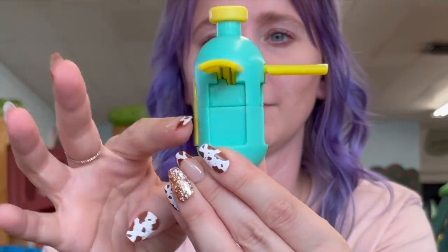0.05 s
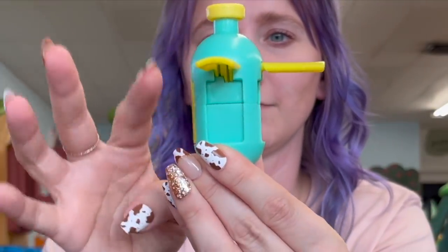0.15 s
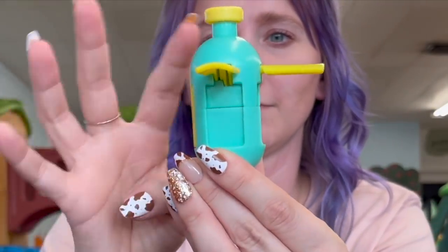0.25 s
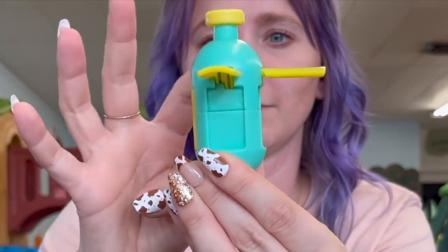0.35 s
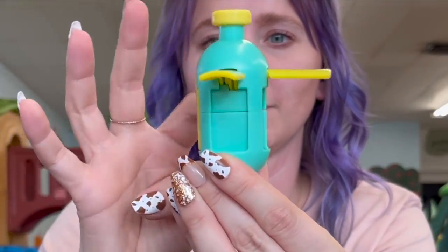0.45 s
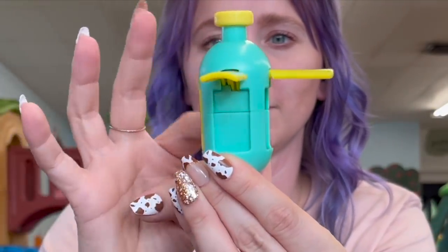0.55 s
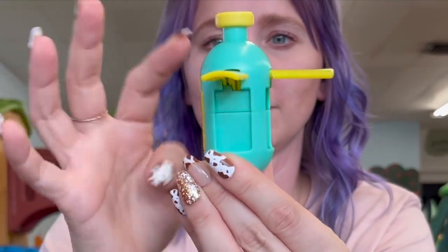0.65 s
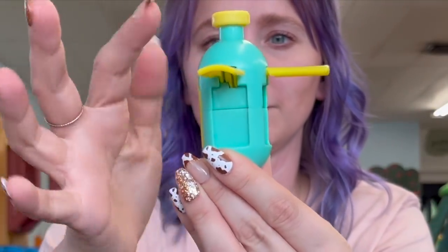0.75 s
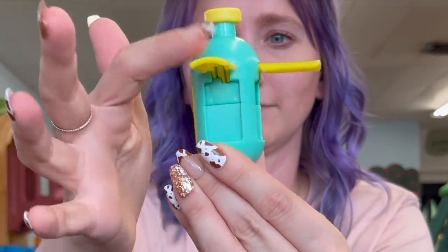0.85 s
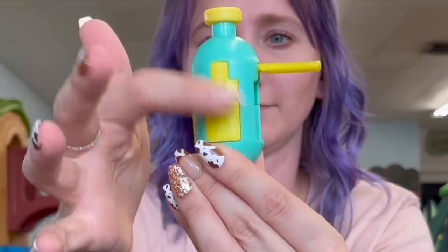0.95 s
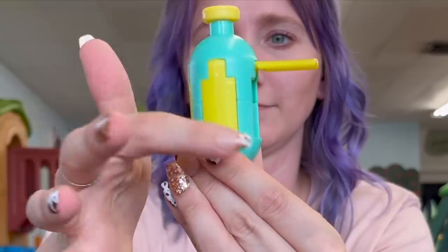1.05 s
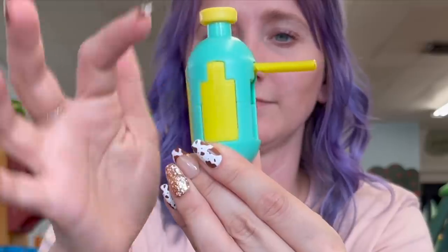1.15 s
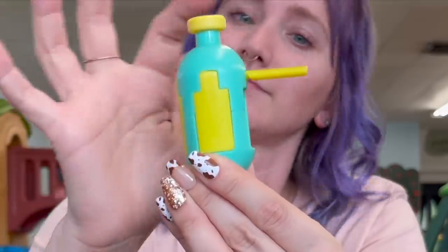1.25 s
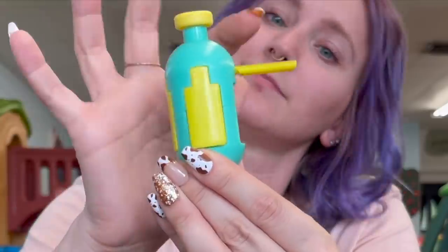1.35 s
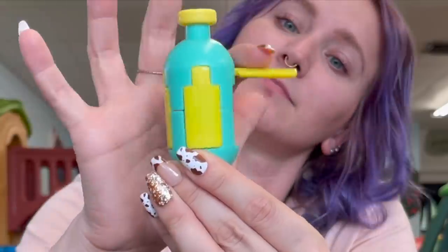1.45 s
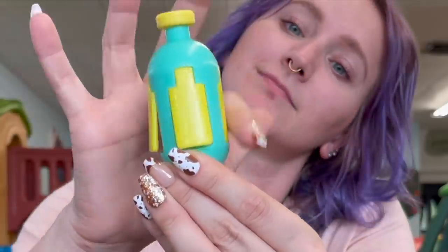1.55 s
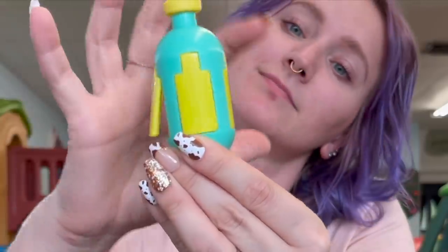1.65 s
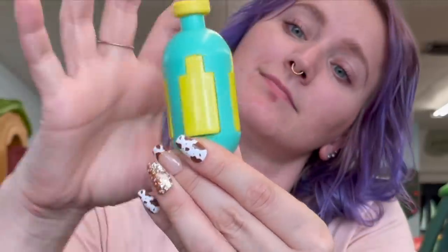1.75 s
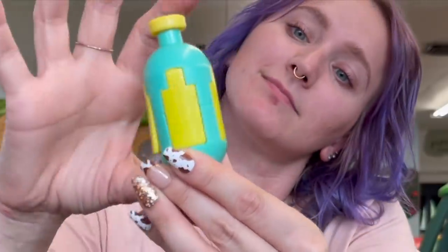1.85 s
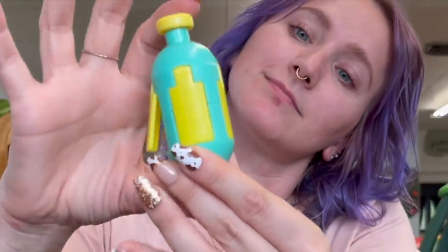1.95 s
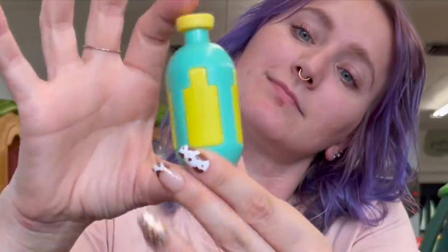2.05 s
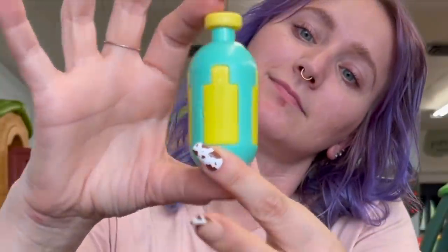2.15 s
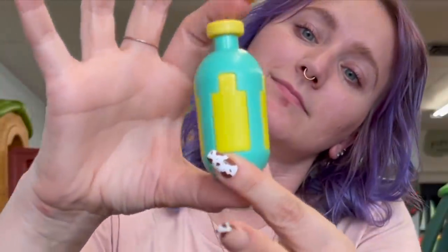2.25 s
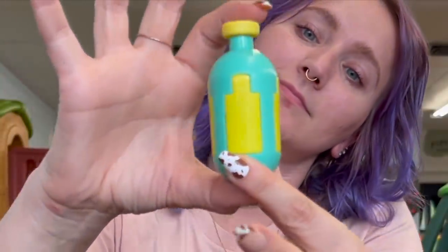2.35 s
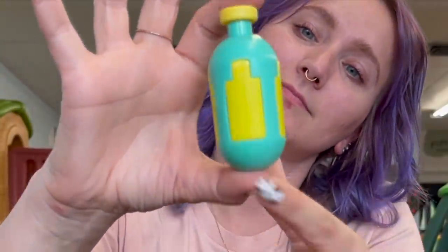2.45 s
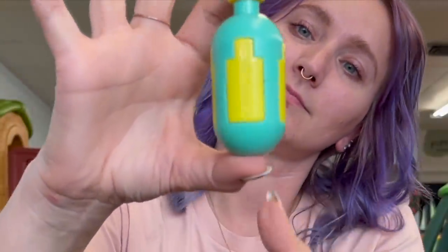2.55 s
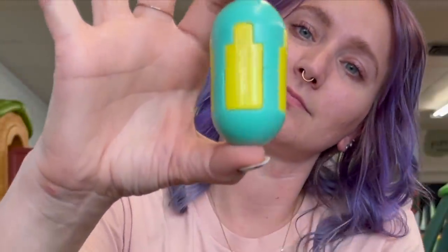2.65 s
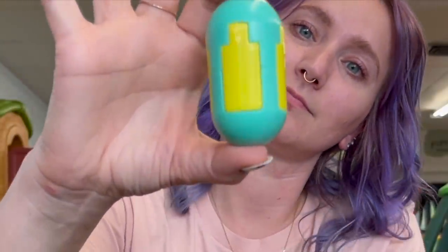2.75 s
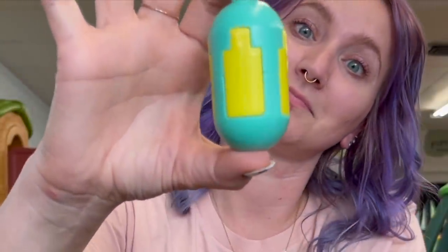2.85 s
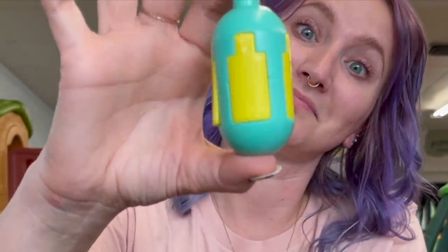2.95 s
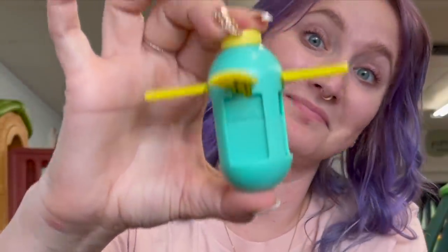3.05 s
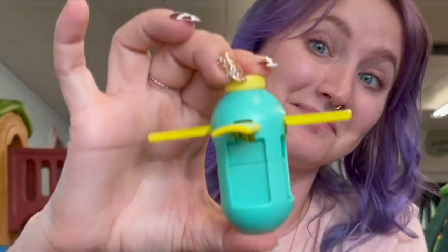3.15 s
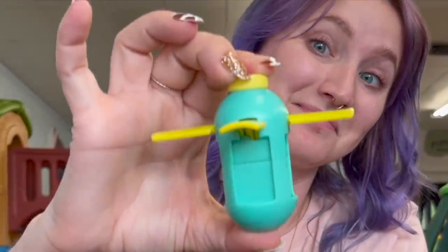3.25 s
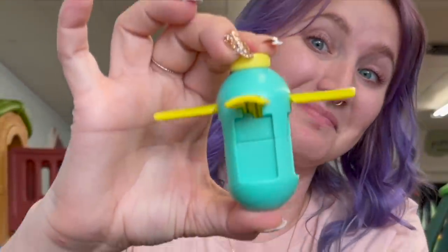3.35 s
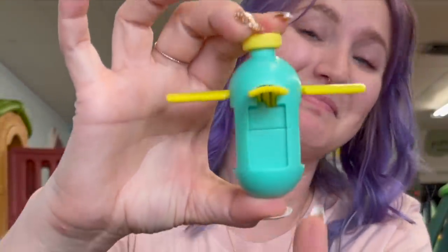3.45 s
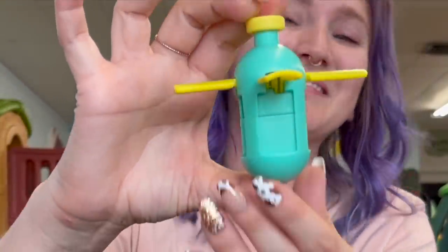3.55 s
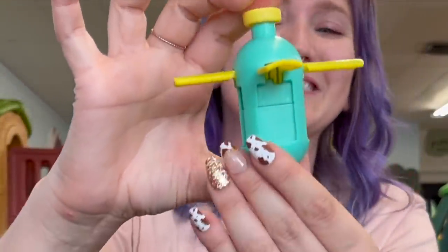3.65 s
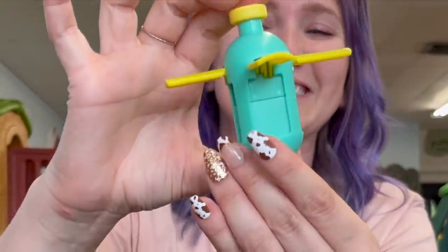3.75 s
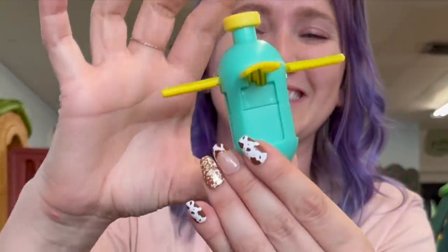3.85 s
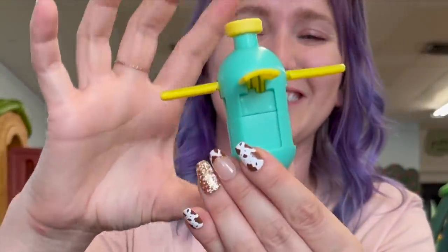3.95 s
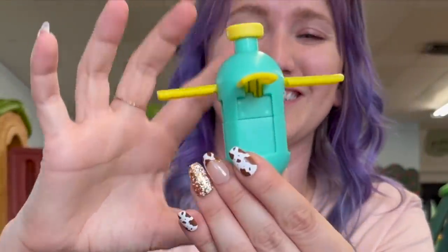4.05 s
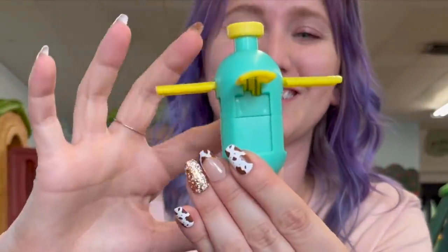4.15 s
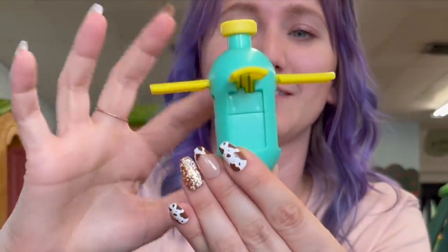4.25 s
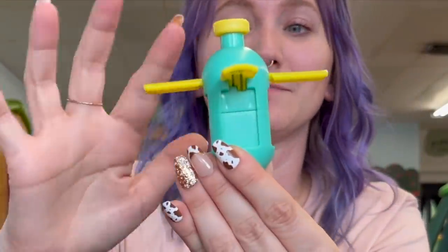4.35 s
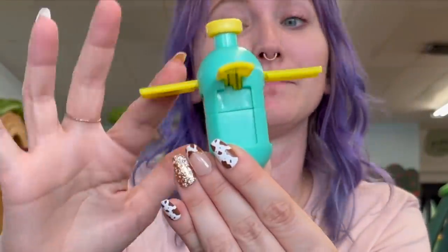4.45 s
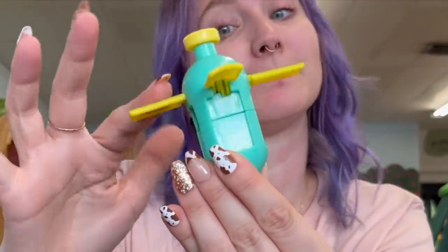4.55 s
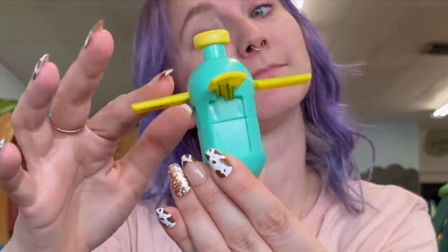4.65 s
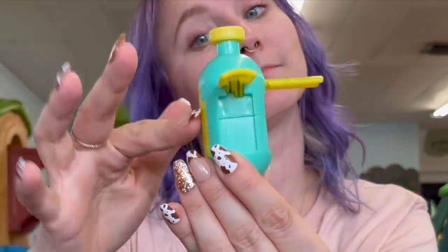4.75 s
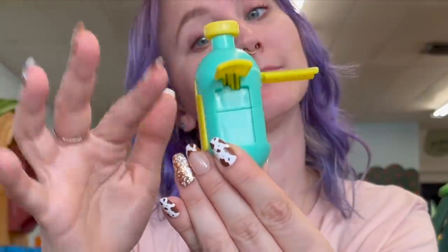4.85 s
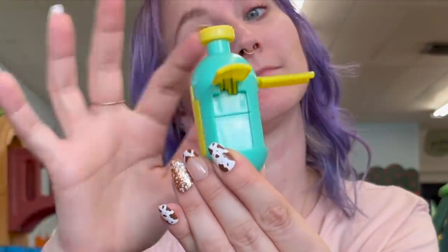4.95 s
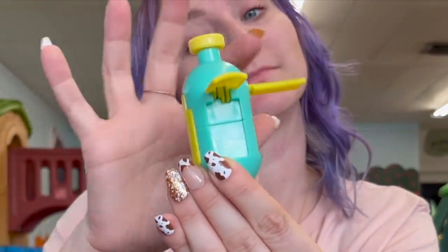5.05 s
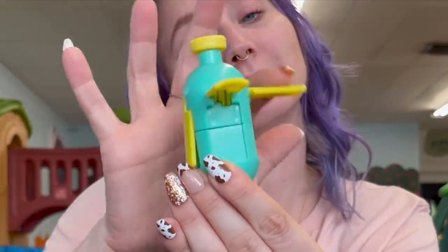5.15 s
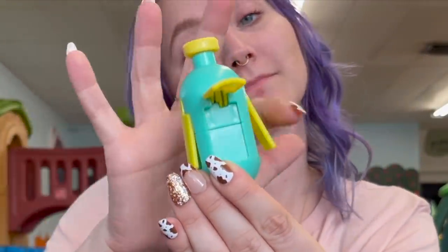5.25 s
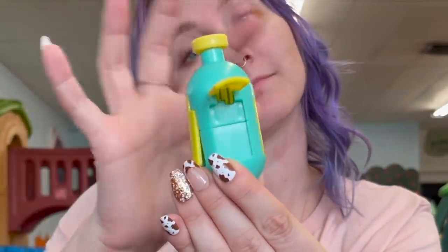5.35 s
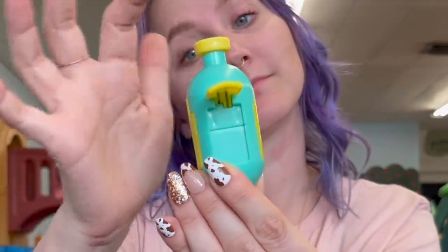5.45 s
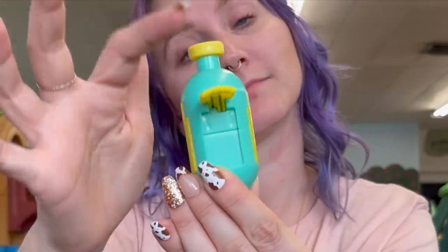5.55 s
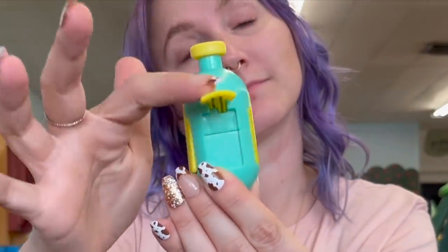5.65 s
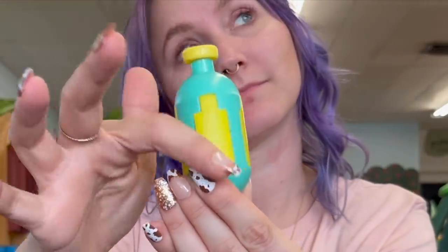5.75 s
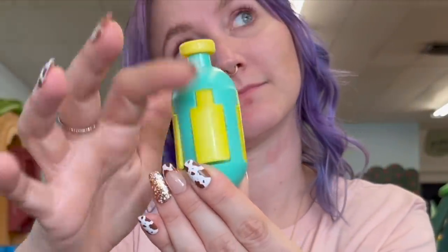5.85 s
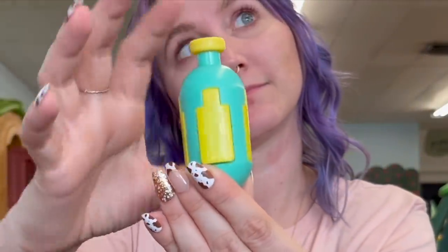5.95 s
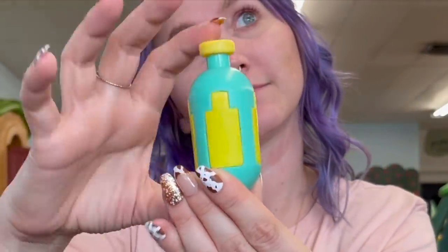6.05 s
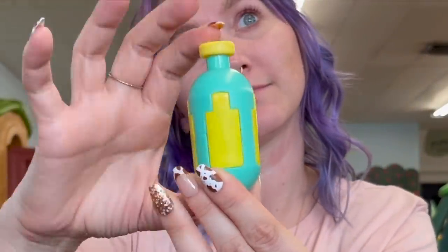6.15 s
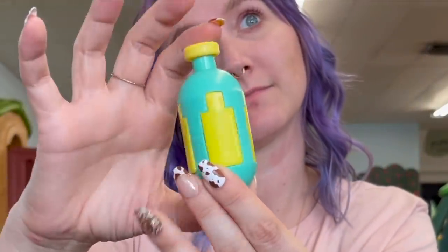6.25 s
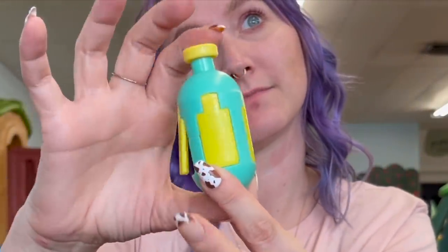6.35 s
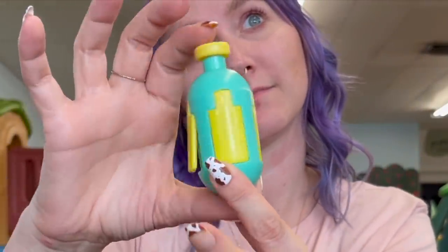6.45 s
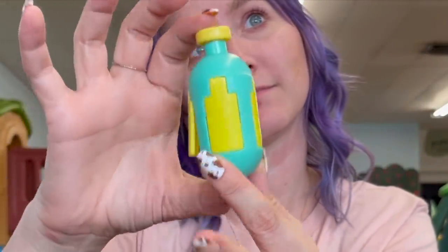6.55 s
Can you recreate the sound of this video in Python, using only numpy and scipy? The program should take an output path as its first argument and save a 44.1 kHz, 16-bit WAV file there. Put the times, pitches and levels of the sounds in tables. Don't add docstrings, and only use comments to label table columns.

```python
import sys
import numpy as np
from scipy import signal
from scipy.fft import rfft, irfft, next_fast_len
from scipy.io import wavfile
from scipy.ndimage import uniform_filter1d

SR = 44100
rng = np.random.default_rng(int(sys.argv[2]) if len(sys.argv) > 2 else 0)


def file_out(sig):
    cols = np.atleast_2d(sig).T
    lim = np.clip(cols, -1, 1)
    pcm = np.round(lim * 32767).astype(np.int16)
    wavfile.write(sys.argv[1], SR, pcm)


def boost(x):
    u = np.asarray(x, float) / 20
    return 10 ** u


N = 291501


def rms_one(x):
    return x / np.sqrt(np.mean(x ** 2) + 1e-20)


def peak_one(x):
    return x / np.abs(x).max()


def at_hz(points, hz):
    table_hz, values = np.array(points)[:, 0], np.array(points)[:, 1]
    return np.interp(np.log(hz), np.log(table_hz + 1), values)


def at_time(points, s):
    times = np.array(points)[:, 0]
    return [np.interp(s, times, column) for column in np.transpose(points)[1:]]


def bandpass(low_hz, high_hz, order=2):
    return signal.butter(order, [low_hz, high_hz], "band", fs=SR, output="sos")


def through(x, response):
    size = next_fast_len(N + 4096)
    hz = np.fft.rfftfreq(size, 1 / SR) + 1
    return irfft(rfft(x, size) * response(hz), size)[..., :N]


def ring(push, hz, t60):
    r, w = boost(-60 / (t60 * SR)), 2 * np.pi * hz / SR
    return signal.lfilter([0, np.sin(w)], [1, -2 * r * np.cos(w), r * r], push)


# f/Hz, left-right likeness [0 to 1]
LIKENESS = [(30, .99), (100, .95), (160, .75), (300, .4), (700, .1), (2000, .4), (4400, .55), (9000, .9),
            (12000, .93)]


def bands(size, shape):
    out, edges = 0, 25 * 2 ** (np.arange(29) / 3)
    white = rng.standard_normal((2, 2, size))
    for k, (low, high) in enumerate(zip(edges, edges[1:])):
        mid, side = signal.sosfilt(bandpass(low, high), white[k % 2])
        hz = np.sqrt(low * high)
        alike = np.clip(at_hz(LIKENESS, hz), 0, 1)
        stereo = np.sqrt(1 + alike) * mid + np.sqrt(1 - alike) * side * [[1], [-1]]
        out = out + shape(hz) * stereo
    return out


# f/Hz, level [dB per Hz]
AIR_NOISE = [(30, -6.5), (50, 1), (80, 0.5), (134, -10), (175, -21.5), (290, -24), (460, -28.5),
             (800, -33.5), (1900, -50.5), (2600, -60.5), (4000, -62.5), (8800, -62), (10300, -71),
             (12000, -74)]
# f/Hz, width [Hz], level/dB
DUCT_RESONANCES = [(46.5, 14, -58), (58.28, 1.8, -51), (73.6, 230, -57)]
# f/Hz, level/dB
MAINS_HUM = [(120, -55.5), (240, -79)]


def ventilation():
    air = boost(-51) * rms_one(bands(N, lambda hz: boost(at_hz(AIR_NOISE, hz))))
    t = np.arange(N) / SR
    for hz, width_hz, level_db in DUCT_RESONANCES:
        duct = ring(rng.standard_normal(N + SR), hz, 6.0 / width_hz)[SR:]
        air = air + boost(level_db) * rms_one(duct)
    for hz, level_db in MAINS_HUM:
        tone = np.sin(2 * np.pi * hz * t + 6 * rng.random())
        air = air + boost(level_db + 1) * tone * boost([[.5], [-.5]])
    return air


# f/Hz, level/dB, t60 [s]
BODY = [(990, -17.5, 0.0081), (1436, -3.5, 0.043), (1490, -3, 0.025), (1737, -2.5, 0.03),
        (1830, -7.5, 0.045), (2000, -9, 0.03)]
WALL = [(3800, -4, 0.024), (4260, -4.5, 0.029), (4714, 0.5, 0.0054), (5000, -1.5, 0.0068),
        (5350, -9.5, 0.012), (5790, 0.5, 0.024), (6500, -2.5, 0.0031), (6840, -4.5, 0.015)]
EDGE = [(7670, -2, 0.0098), (8400, 4.5, 0.012), (9600, -1.5, 0.0023), (10200, 3.5, 0.0042),
        (10460, 6.5, 0.018), (10400, 4, 0.0027), (10730, 0, 0.0051), (11230, -0.5, 0.0032),
        (11300, -4.5, 0.015), (15200, -6, .003)]
# start t/s, end t/s, start level/dB, end level/dB
RUBS = [(0, 0.008, -44.5, -47.5), (0.43, 0.451, -51.5, -53), (0.86, 0.961, -62.5, -67),
        (1.428, 1.46, -55.5, -59.5), (1.474, 1.535, -51, -49.5), (1.749, 1.867, -64, -81),
        (2.036, 2.134, -63.5, -76), (2.176, 2.32, -58, -72.5), (2.365, 2.426, -73, -66),
        (2.512, 2.598, -78.5, -78.5), (2.936, 3.005, -80.5, -42.5), (3.436, 3.476, -49.5, -61),
        (3.491, 3.549, -68, -80.5), (3.745, 3.855, -84.5, -85.5), (4.082, 4.144, -74.5, -53),
        (4.413, 4.482, -75, -75), (4.616, 4.639, -87, -84), (4.696, 4.726, -50, -58.5),
        (5.13, 5.195, -55, -53.5), (5.62, 5.68, -53, -65.5), (5.706, 5.736, -53, -49),
        (5.966, 6.053, -64, -77), (6.184, 6.394, -72.5, -61.5), (6.49, 6.62, -59, -73.5)]


def shell(push):
    modes = BODY[1:] + WALL + EDGE[:5]
    return sum(boost(db) * ring(push, hz, 0.35 * t60) for hz, db, t60 in modes)


def rub():
    slips_per_s, spread_db, skin_cut_hz = 1800, 4.5, 3000
    sizes = boost(spread_db * np.minimum(rng.exponential(1, N), 3))
    slips = sizes * rng.choice([-1, 1], N) * (rng.random(N) < slips_per_s / SR) + 1e-18
    slips = signal.sosfilt(signal.butter(1, skin_cut_hz, fs=SR, output="sos"), slips)
    drag, t = np.zeros(N), np.arange(N) / SR
    for start, end, start_db, end_db in RUBS:
        level = boost(np.interp(t, [start, end], [start_db, end_db]))
        drag += level * np.clip((t - start) / 0.0085, 0, 1) * (t < end)
    return shell(slips * drag + 1e-18) / np.std(shell(slips))


# t/s, peak level/dB, body level/dB, edge level/dB, flap f/Hz
SNAPS = [(0.0109, -16, -9, 8.5, 5700), (0.0424, -21.5, -23.5, 10, 4600), (0.4556, -21.5, -11, 9, 4200),
         (0.9384, -31.5, -7, 5.5, 5620), (0.9481, -11, -6.5, 3, 6410), (0.972, -19, -23.5, 0.5, 5367),
         (0.9788, -26.5, -23, -4, 5300), (1.4932, -7, -7.5, 4, 5770), (1.5224, -28, -21, -19, 5580),
         (1.6358, -36, -10.5, 4.5, 4250), (1.7128, -30.5, -17.5, 2, 5850),
         (2.2144, -34.5, -2.5, -1.5, 4790), (2.9678, -37, 5, -1.5, 4920), (2.979, -26.5, -8.5, 0, 6160),
         (2.9941, -31.5, 8.5, 4, 5200), (3.002, -11, -10, 8.5, 5320), (4.1287, -13.5, -11.5, 6.5, 4550),
         (4.2517, -31, -2, 9, 3810), (4.7205, -14, -14, 8, 4620), (5.1968, -16, -3.5, 12.5, 6840),
         (5.3035, -36, -6.5, 14, 6750), (5.7515, -30.5, -3.5, -21, 5800)]


def snaps():
    return [(s, db, body, edge, 1.334, hz) for s, db, body, edge, hz in SNAPS]


# t/s, peak level/dB, body level/dB, edge level/dB
REBOUNDS = [(0.0142, -20, -7, -1.5), (0.4585, -15.5, -16.5, 4), (0.9514, -21, -4.5, -1),
            (0.9777, -22.5, -19, -8), (1.424, -44.5, -3, 12.5), (1.4357, -52, -8, 12), (1.443, -54, -11, 6),
            (1.506, -27, -6.5, 2.5), (2.9844, -30, -7.5, -3.5), (2.998, -33, -3.5, 9.5),
            (3.0056, -18.5, -9.5, 8), (3.008, -16.5, -10.5, 1), (3.0167, -28.5, 5, -8),
            (4.7276, -19.5, -4.5, -12), (5.2105, -37.5, -4.5, 6.5), (5.7217, -38.5, 3, -4.5),
            (5.74, -32.5, -14, -2)]


def rebounds():
    return [(s, db, body, edge, 0.72, 6200) for s, db, body, edge in REBOUNDS]


TICK_MS = 0.64
# t/s, peak level/dB, edge level/dB
EDGE_TICKS = [(0.1388, -40, 10.5), (0.5035, -34.5, 7), (0.8693, -47.5, 5), (1.8328, -43, 1),
              (2.0308, -36, -2), (2.3722, -39.5, -3), (2.51, -57, -2.5), (3.425, -54.5, 0),
              (3.4441, -46, 17), (3.5115, -64.5, 20.5), (4.3013, -41, 4), (4.4397, -42.5, -1),
              (4.449, -58.5, 20), (4.4738, -50, 11), (4.609, -63, 10), (4.6256, -56, 3), (4.493, -60.5, 3),
              (4.925, -42, 4), (5.6302, -52, 9), (5.673, -49, 5), (5.187, -35.5, -10), (5.286, -47, 15),
              (5.335, -48, 11), (5.421, -42.5, 7), (5.663, -47, 10), (5.693, -41, 11), (6.04, -46, -0.5),
              (6.14, -45, -3.5), (6.3628, -53, 18), (6.387, -56, -9)]


def edge_ticks():
    return [(s, db, -13, edge, TICK_MS, 6400) for s, db, edge in EDGE_TICKS]


# t/s, peak level/dB, body level/dB
BODY_TAPS = [(0.4355, -43.5, 3.5), (0.443, -48, -5), (0.8721, -38, -12.5), (1.109, -56.5, 13.5),
             (1.8112, -52, -1.5), (1.943, -64.5, 3), (2.094, -60.5, 11), (2.1962, -51, 4),
             (2.2468, -59.5, 7), (2.4067, -56, 2), (2.4294, -48.5, 1.5), (2.9328, -58, 13.5),
             (3.4617, -56, 14), (3.4859, -39.5, 1.5), (3.7623, -61.5, 8), (3.792, -68, 5.5),
             (4.0799, -60.5, 4.5), (4.6996, -51, 5), (5.619, -70.5, 9.5), (5.6342, -37.5, -5.5),
             (6.2084, -45, -1), (6.227, -45, -4), (6.466, -66, 8), (6.4748, -61.5, 10.5),
             (6.4978, -43, -0.5), (6.5338, -44, -3.5), (6.5903, -48, 5)]


def body_taps():
    return [(s, db, body, -2.5, TICK_MS, 5300) for s, db, body in BODY_TAPS]


# t/s, peak level/dB, f/Hz
KNOCKS = [(0.869, -46.5, 312), (0.949, -42.5, 380), (1.105, -47, 546), (1.492, -38.5, 748),
          (1.841, -51, 579), (2.212, -56, 560), (3.003, -44, 719), (3.489, -52, 395), (3.582, -51, 586),
          (4.72, -44.5, 299.5), (5.631, -42, 614), (6.299, -57, 275)]


def knocks():
    out = np.zeros(N)
    for s, peak_db, pitch_hz in KNOCKS:
        push = np.zeros(N) + 1e-18
        at = round(s * SR)
        push[at:at + 30] = np.hanning(30)
        out += boost(peak_db) * peak_one(ring(push, pitch_hz, 0.03))
    return out


# t/s, peak level/dB, edge level/dB
WALL_TICKS = [(0.9163, -42.5, -25), (1.4176, -37, -6), (1.7647, -38.5, -28), (1.846, -39.5, 4.5),
              (1.9186, -54, -35.5), (2.074, -47.5, -8), (2.0996, -43, -4), (2.2232, -43.5, -1),
              (2.24, -44.5, 2), (2.276, -53, -3), (2.2997, -43, -2.5), (2.4522, -41, -5),
              (2.387, -53.5, 11), (2.465, -53.5, -5), (2.5246, -53, 0.5), (2.53, -53.5, 1.5),
              (2.59, -64, 5.5), (2.756, -56, -20), (2.8716, -62, -20), (4.1045, -42, -3.5),
              (4.116, -39.5, 0.5), (4.4286, -44.5, -14), (5.14, -44, -6.5), (5.148, -37.5, -7),
              (5.1675, -50, -8.5), (5.6457, -42.5, -1.5), (5.9254, -51.5, -16.5), (6.173, -56, -16),
              (6.1941, -44, -17.5), (6.259, -41, -7)]


def wall_ticks():
    return [(s, db, -8.5, edge, TICK_MS, 4700) for s, db, edge in WALL_TICKS]


# t/s, peak level/dB, body level/dB, edge level/dB, flap f/Hz
PRESSES = [
    (1.7977, -48.5, -16, 1.5, 5790),
    (2.1086, -42, -6.5, 0, 4210),
    (2.579, -46.5, -13.5, -1, 5330),
    (5.7277, -18.5, -6.5, 0, 5000),
    (5.9705, -47.5, -9.5, 6, 5030),
    (6.003, -40, -6.5, -4, 4850),
    (6.2957, -43.5, -1.5, -4, 4180),
    (6.337, -56, 14.5, -11, 3900),
    (6.5072, -33, -10, 1, 5230),
]


def presses():
    return [(s, db, body, edge, 2.8, hz) for s, db, body, edge, hz in PRESSES]


def rattle(t, length_ms):
    impacts = rng.standard_normal(t.size) * (rng.random(t.size) < .4)
    length = max(length_ms, .1) / 1000
    return impacts * (1 - np.exp(-t / 0.00016)) * np.exp(-t / length)


def strike(push, modes, crack):
    detune = 1 + .015 * rng.standard_normal(len(modes))
    rings = 0
    for (hz, db, t60), shift in zip(modes, detune):
        rings = rings + boost(db) * peak_one(ring(push, hz * shift, t60))
    near = peak_one(peak_one(rings) + 1.1 * peak_one(signal.sosfilt(crack, push)))
    smooth = signal.sosfilt(crack, np.arange(push.size) == 0)
    far = .4 * near + smooth * np.sqrt(np.sum(near ** 2) / np.sum(smooth ** 2))
    return near, far


# t/s, f/Hz, ring level/dB under the contact
CAVITY = [(0, 2170, -11), (0.46, 2183, -17.5), (1.0, 2154, -23.5), (1.45, 1600, -26), (1.7, 1803, -22),
          (2.9, 1706, -21), (3.0, 2232, -28), (4.13, 2263, -11.5), (4.72, 2106, -12), (5.2, 2000, -27),
          (5.73, 1764, -13), (6.61, 1800, -18)]
# t/s, loudest edge mode f/Hz,
# sparkle level/dB under the contact, share sent to the room level/dB
FACING = [(0.01, 10130, -12.5, 1), (0.04, 8400, -11, 0), (0.46, 10450, -6, -1.5), (0.95, 10400, -8, -0.5),
          (1.49, 10860, -18.5, 0.5), (1.71, 9700, -22.5, -2), (2.4, 9450, -24, -4), (3.0, 8980, -19.5, 0.5),
          (3.5, 9430, -10.5, -5), (4.13, 10600, -5, 0.5), (4.25, 10150, -1, -1.5), (4.72, 10900, -3.5, 1.5),
          (5.2, 8300, 2.5, -2), (5.3, 8400, -5, -0.5), (5.73, 10700, -10, -3.5), (6.5, 10400, -9, -2)]


def contacts():
    flap_focus_db = 11
    out, t = np.zeros((4, N + 2048)), np.arange(2048) / SR
    body_crack, edge_crack, sparkle = bandpass(1000, 2600), bandpass(7500, 16500), bandpass(11500, 15800)
    every = snaps() + rebounds() + edge_ticks() + body_taps() + wall_ticks() + presses()
    for k, (s, peak_db, body_db, edge_db, length_ms, flap_hz) in enumerate(sorted(every)):
        rows = [0, 1 + k % 3]
        push = rattle(t, length_ms)
        at = round(s * SR)
        span = slice(at, at + t.size)
        cavity_hz, cavity_db = at_time(CAVITY, s)
        edge_hz, sparkle_db, room_db = at_time(FACING, s)
        out[rows, span] += boost(peak_db + cavity_db) * peak_one(ring(push, cavity_hz, .014))
        out[0, span] += boost(peak_db + sparkle_db) * peak_one(signal.sosfilt(sparkle, push))
        body = BODY + [(cavity_hz, 2, .018)]
        wall = [(hz, db - flap_focus_db * np.log2(hz / flap_hz) ** 2, t60) for hz, db, t60 in WALL]
        wall = wall + [(flap_hz, 4, .012)]
        edge = EDGE + [(edge_hz, 7, 0.0027)]
        wall_crack = bandpass(flap_hz * 0.58, flap_hz * 1.53)
        parts = [(body, body_db, body_crack), (wall, 0, wall_crack), (edge, edge_db, edge_crack)]
        for modes, part_db, crack in parts:
            near, far = strike(push, modes, crack)
            out[rows, span] += boost(peak_db + part_db) * np.array([near, boost(room_db) * far])
    small = signal.butter(2, 750, "high", fs=SR, output="sos")
    return signal.sosfilt(small, out[:, :N])


# f/Hz, t60 [s]
ROOM_T60 = [(300, 0.43), (1000, 0.97), (2000, 0.48), (4000, 0.62), (8000, 0.41), (11000, 0.53),
            (12500, 0.14), (14000, 0.1)]
# f/Hz, level/dB
ROOM_COLOUR = [(300, -23.5), (1000, -37.5), (2000, -31), (3000, -36.5), (5200, -33), (7000, -39),
               (8500, -36.5), (13500, -48)]


def room(x):
    t = np.arange(SR * 3 // 4) / SR

    def dying(hz):
        late, early = boost(-60 * t / at_hz(ROOM_T60, hz)), 3.2 * boost(-60 * t / 0.069)
        return boost(at_hz(ROOM_COLOUR, hz)) * (late + early)

    reply = bands(t.size, dying) * np.clip((t - .003) / 0.0064, 0, 1) * boost(-10.5)
    return signal.fftconvolve(x[None], reply, axes=1)[:, :N]


# f/Hz, left over right level/dB
PORT_DB = [(60, 1), (1000, 3), (2000, 1), (3000, 5), (4200, 7), (6500, 6), (8000, 3), (9500, 0),
           (16000, -1)]
# f/Hz, left lead [radians]
PORT_LEAD = [(0, 0), (1000, .1), (1800, .6), (2600, 1.6), (4200, .8), (6200, .3), (7500, 1), (8600, -.2),
             (10150, -3.14), (11900, -6.28), (13600, -9.42), (15800, -12.56), (17000, -13)]


def ports(x):
    def response(hz):
        tilt = boost(at_hz(PORT_DB, hz) / 2)
        lead = np.exp(1j * np.interp(hz, *np.transpose(PORT_LEAD)))
        return np.array([tilt * lead, 1 / tilt])
    return through(x, response)


def scene():
    background = ventilation()
    soft = rub() + knocks()
    near, *far = contacts()
    replies = room(far[0] + soft) + room(far[1]) + room(far[2])
    return ports(near + soft + replies) + background


def held_peak(level_db, release_db_s):
    ramp = release_db_s * np.arange(N) / SR
    return np.maximum.accumulate(level_db + ramp, axis=-1) - ramp


def gain_control(x, knee_db, share, release_db_s):
    over = np.maximum(20 * np.log10(np.abs(x).max(axis=0) + 1e-9) - knee_db, 0)
    r = np.exp(-1 / (0.069 * SR))
    cut_db = signal.lfilter([1 - r], [1, -r], held_peak(share * over, release_db_s))
    return x * boost(-cut_db)


# low f/Hz, high f/Hz, quiet threshold level/dB, threshold under last loud moment level/dB
TREBLE_GATES = [(9730, 10600, -105, -46.5), (10600, 11500, -95.5, -42.5), (10650, 12100, -77, -29),
                (12100, 12900, -65, -23.5), (12500, 17200, -84.5, -10)]


def drop_weak_treble(x):
    turn = np.array([[1, 1], [1, -1]]) / np.sqrt(2)
    x = turn @ x
    for low_hz, high_hz, quiet_db, under_db in TREBLE_GATES:
        band = signal.sosfiltfilt(bandpass(low_hz, high_hz, order=8), x)
        level_db = 10 * np.log10(uniform_filter1d(band ** 2, size=500) + 1e-20)
        loud_db = held_peak(level_db.max(axis=0), release_db_s=45)
        margin = level_db - np.maximum(quiet_db, loud_db + under_db)
        x = x - band / (1 + np.exp(np.clip(2 * margin, -30, 30)))
    return turn @ x


# f/Hz, level/dB
MICROPHONE = [(1000, -5.5), (2400, 1.5), (2900, 0.5), (3600, 1), (11800, 7), (12600, -0.5), (13600, -19.5),
              (14600, -8.5), (16200, -15), (17000, -34.5)]


def band_limit(x):
    return signal.sosfilt(signal.butter(12, 17110, fs=SR, output="sos"), x)


def record(dry):
    x = through(dry, lambda hz: boost(at_hz(MICROPHONE, hz)))
    x = signal.sosfilt(signal.butter(5, 46, "high", fs=SR, output="sos"), x)
    x = gain_control(x, knee_db=-8.0, share=0.04, release_db_s=7.0)
    x = .9 * np.tanh(x / .9)
    x = signal.sosfilt(signal.cheby2(10, 60, 16900, fs=SR, output="sos"), x)
    return band_limit(drop_weak_treble(x))


dry = scene()
out = record(dry)
file_out(out)
```